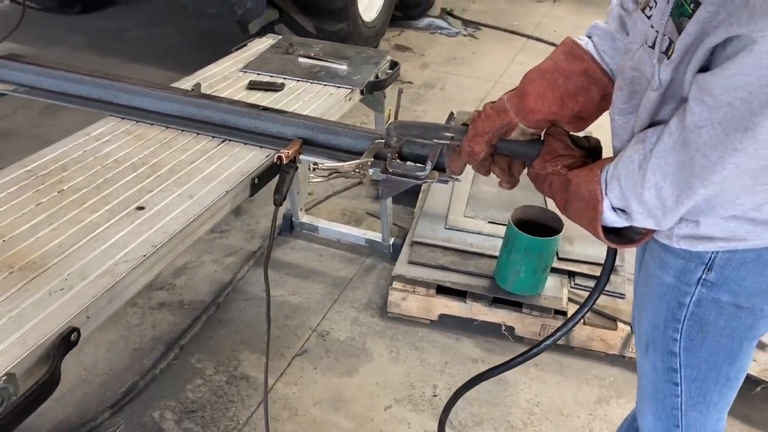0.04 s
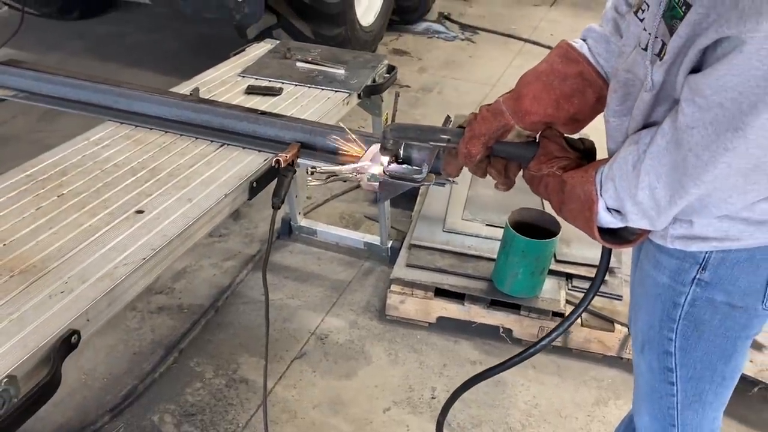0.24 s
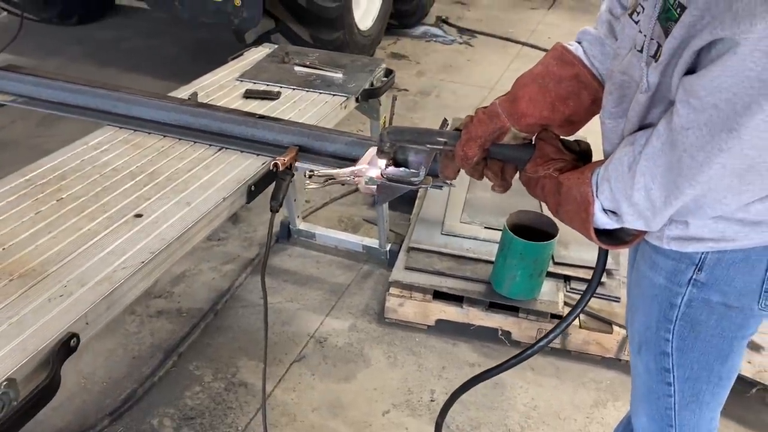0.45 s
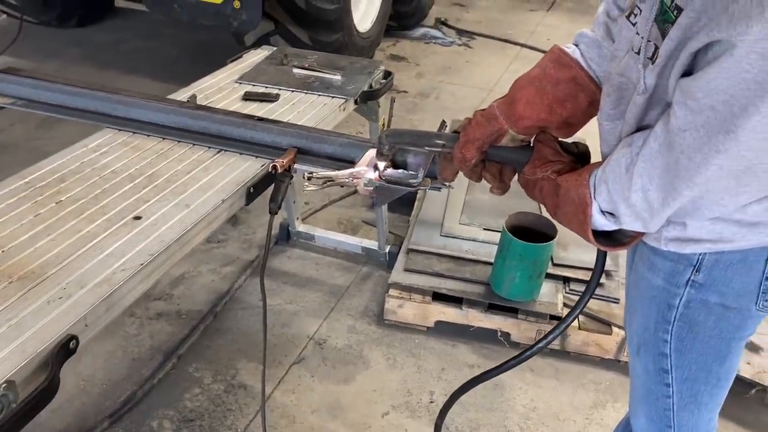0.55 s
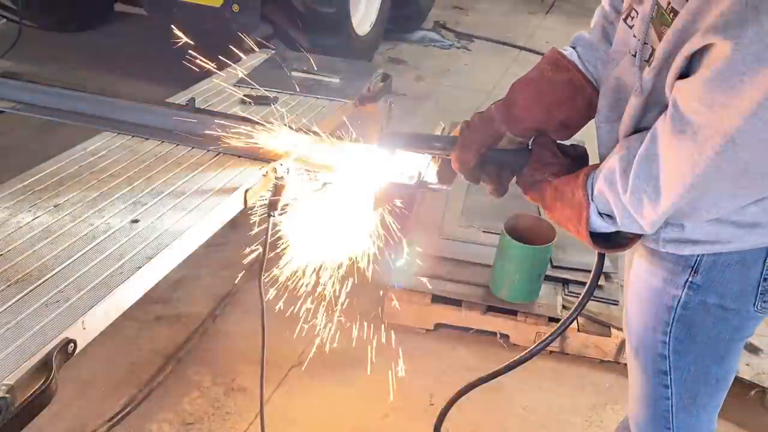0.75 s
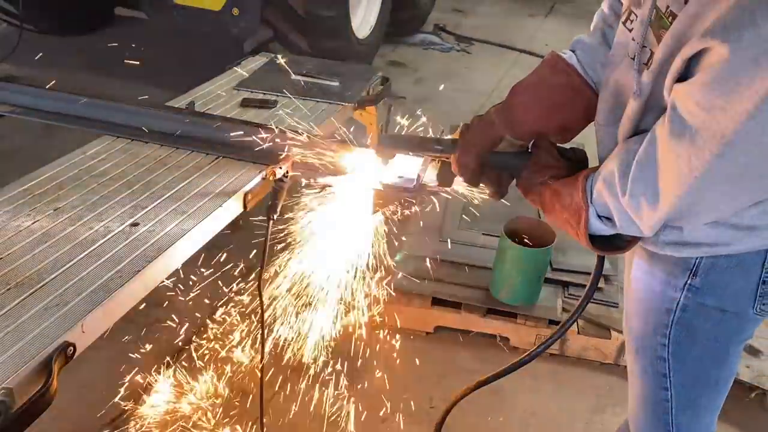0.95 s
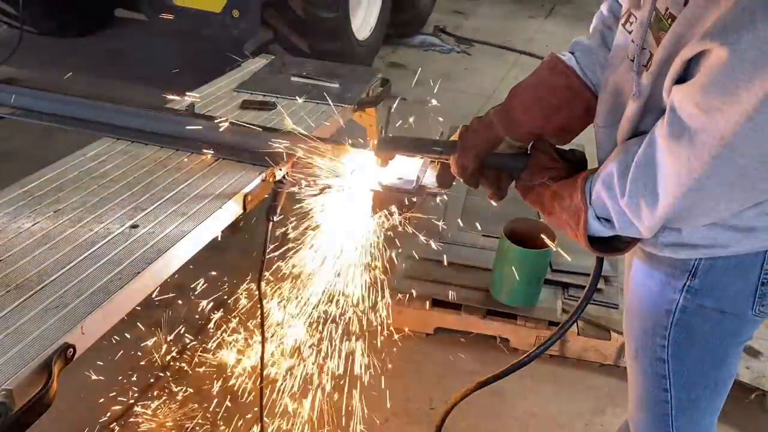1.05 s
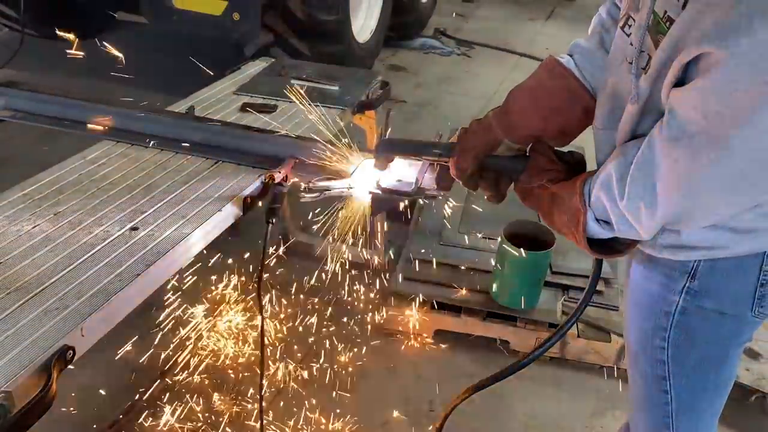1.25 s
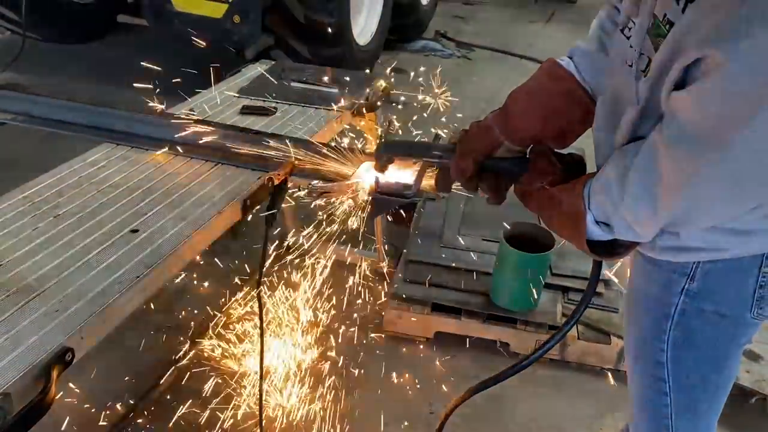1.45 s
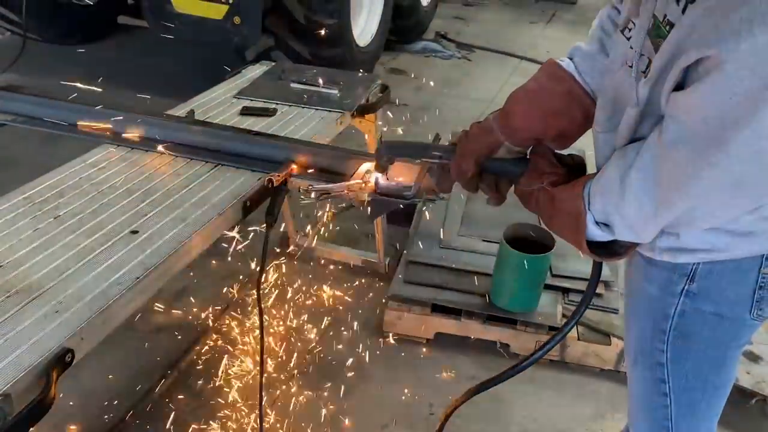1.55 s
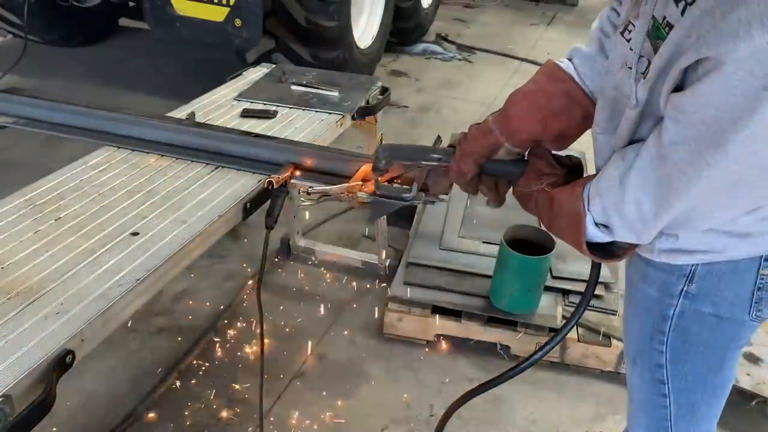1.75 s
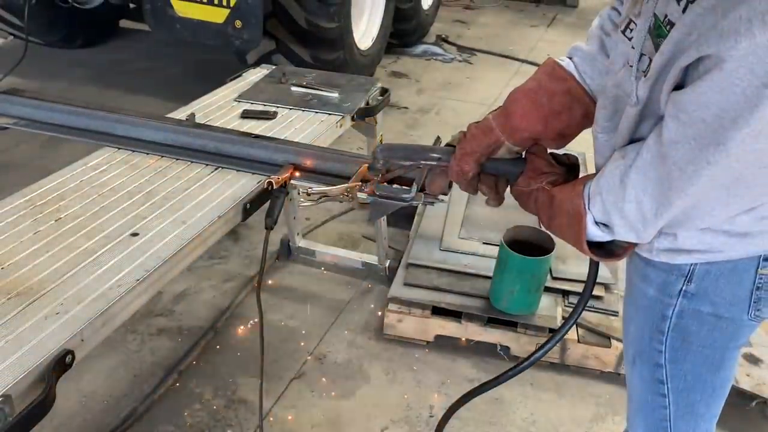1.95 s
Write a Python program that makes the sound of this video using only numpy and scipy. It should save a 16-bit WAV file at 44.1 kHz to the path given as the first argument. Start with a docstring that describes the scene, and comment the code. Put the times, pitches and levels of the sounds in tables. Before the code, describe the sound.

A plasma torch's harsh crackling hiss cuts metal, thins, snaps off, leaving soft blowing air

```python
"""A plasma torch cuts a steel tube in a workshop, heard through a close pair of microphone ports.
First comes room noise with a dying hiss; at 0.2 s the air valve opens and the pilot arc hisses (shaped noise).
Near 0.7 s the arc bites through with a thump and sputters molten steel: noise, random sparks, low puffs.
It runs off the edge into a thinner hiss near 1.4 s and pops, three pulses close together near 1.475 s.
At 1.74 s it pops once more and goes out, leaving the cooling air, again shaped noise, to blow."""
import sys
import numpy as np
from scipy.fft import rfft, irfft
from scipy.io import wavfile

SR = 44100
rng = np.random.default_rng(int(sys.argv[2]) if len(sys.argv) > 2 else 0)


def output_pcm(signal):
    """Save a mono or channel-first signal as 16-bit PCM at the path in sys.argv[1].

    Samples are clipped to [-1, 1] before scaling.
    """
    pcm = np.clip(np.atleast_2d(signal).T, -1, 1) * 32767
    wavfile.write(sys.argv[1], SR, np.round(pcm).astype(np.int16))


N = 88200
TIME = np.arange(N) / SR  # s
FREQS = np.maximum(np.fft.rfftfreq(N, 1 / SR), 1)  # Hz, kept above zero for logs and divisions
CUTOFF_HZ = 15900


def from_db(db):
    """Decibels to amplitude gain."""
    return 10 ** (np.asarray(db) / 20)


def rms_one(x):
    """Scale to unit rms."""
    return x / np.sqrt(np.mean(x ** 2) + 1e-20)


def over_hz(points):
    """A table joined by straight lines over log frequency."""
    hz, value = np.transpose(points)
    return np.interp(np.log(FREQS), np.log(hz), value)


def over_time(points):
    """A two-column table joined by straight lines over time."""
    return np.interp(TIME, *np.transpose(points))


def low_part(x, edge_hz, order):
    """The part of a sound below an edge, without any delay."""
    return irfft(rfft(x) / (1 + (FREQS / edge_hz) ** order), N)


def drift(rate_hz):
    """Random wandering, mostly slower than the rate, with spread 1."""
    return rms_one(low_part(rng.standard_normal(N), rate_hz, 2))


def far_noise(colour):
    """Diffuse room noise, alike in both channels only in the bass; rms 1."""
    alike = 1 / (1 + (FREQS / 450) ** 2)
    white = rfft(rng.standard_normal((3, N)))
    channels = np.sqrt(alike) * white[0] + np.sqrt(1 - alike) * white[1:]
    return rms_one(irfft(from_db(over_hz(colour)) * channels, N))


# Colour of the room noise: pitch_hz, level_db
SHOP_COLOUR = [(20, -12), (55, -1), (120, 5), (300, -2), (1000, -5), (3000, -2.5), (7000, -9), (10000, -34),
               (16000, -42)]
# Colour of the dying hiss: pitch_hz, level_db
TAIL_COLOUR = [(50, -3), (180, -1), (500, -4), (1200, 0), (2000, 2.5), (2900, 0.5), (6200, -4.5), (7000, 3),
               (7800, -8), (12000, -12), (16000, -13)]
SHOP_DB, TAIL_START_DB = -67.5, -52.5
TAIL_BRIGHT_HZ = 5970  # the hiss is split here into a dull and a bright part
DULL_FALL_DB_PER_S, BRIGHT_FALL_DB_PER_S = 77, 166


def workshop():
    """Steady diffuse room noise and a dying hiss whose treble fades faster than the rest."""
    tail = from_db(TAIL_START_DB) * far_noise(TAIL_COLOUR)
    dull = low_part(tail, TAIL_BRIGHT_HZ, 4)
    bright = tail - dull
    dying_dull = dull * from_db(-DULL_FALL_DB_PER_S * TIME)
    dying_bright = bright * from_db(-BRIGHT_FALL_DB_PER_S * TIME)
    return from_db(SHOP_DB) * far_noise(SHOP_COLOUR) + dying_dull + dying_bright


def echo(share):
    """Response of the direct sound plus one reflection from a surface close by, 3.6 ms later."""
    return 1 + share * np.exp(-2j * np.pi * FREQS * 0.0036)


def scatter():
    """Response of the direct sound plus weak early reflections from bench, pallets and floor."""
    count = 16
    delays_s = rng.uniform(.004, .03, count)
    sizes = rng.choice([-1, 1], count) / np.sqrt(count)
    spray = sum(size * np.exp(-2j * np.pi * FREQS * s) for s, size in zip(delays_s, sizes))
    return 1 + 0.28 * spray


# How far the left port leads the right: pitch_hz, lead_rad
PORT_PHASE = [(50, .05), (1700, .3), (2800, 1.8), (3300, .3), (4000, .3), (5300, 1.9), (6300, .5),
              (7000, .3), (7900, -2.9), (8750, -3.3), (9750, -6.1), (10400, -6.4), (11600, -9.3),
              (12550, -9.5), (13650, -12.4), (14700, -12.8), (15200, -15.6), (16000, -15.7)]
# Level of the left port above the right: pitch_hz, difference_db
PORT_BALANCE = [(100, 2.5), (600, 0), (1500, -2.5), (3200, 1.5), (4300, -0.5), (7200, 2), (8500, 0.5),
                (16000, 0)]


def at_ports(left, right):
    """Two spectra get the phase and level differences of the ports; returns stereo sound."""
    tilt = from_db(over_hz(PORT_BALANCE) / 2)
    right_lag = np.exp(-1j * over_hz(PORT_PHASE))
    return irfft(np.array([left * tilt, right / tilt * right_lag]), N)


# Likeness of a near sound at the two ports, 1 being the same: pitch_hz, likeness
PORT_LIKENESS = [(60, .93), (500, .86), (1300, .88), (2800, .55), (4000, .85), (5600, .42), (7300, .5),
                 (8400, .98), (9100, .75), (10000, .97), (10900, .78), (12000, .98), (13000, .8),
                 (14000, .97), (15000, .75), (15600, .97)]


def near_noise(source, gain):
    """A coloured source plus its diffuse reflections, which differ between the ports; rms 1."""
    alike = np.clip(over_hz(PORT_LIKENESS), 0, .995)
    shared = np.sqrt(alike) * rfft(rms_one(source))
    diffuse = np.sqrt(1 - alike) * rfft(rng.standard_normal((2, N)))
    left, right = gain * (shared + diffuse)
    return rms_one(at_ports(left, right))


# Narrow resonances of the torch and the work: pitch_hz, width_hz, lift_db
RESONANCES = [(517, 130, 3.5), (742, 70, 5.5), (1078, 21.5, 8.5), (1152, 130, 6), (1385, 76, 6.5),
              (1732, 73, 5.5), (2490, 49, 4.5), (3263, 40, 5.5), (3553, 91, 7.5), (3820, 100, 4),
              (4040, 30, 4.5), (4060, 35, 3), (4250, 58, 4), (4810, 130, 2), (5520, 120, 2.5),
              (6470, 77, 2.5), (6685, 56, 4), (11160, 92, 7)]
ROAR_BELOW_HZ = 3120  # the roar lies below this, the hiss above


def torch(stage, colour, sparks_per_s, spark_db, flutter_db, roar_flutter_db):
    """Jet turbulence and the crackle of sparks, through the resonances; hiss and roar flutter separately."""
    time_s, level_db, roar_db = np.transpose(stage)
    # Sparks strike at random with uneven strength; spark_db is their level against the turbulence
    sizes = from_db(5.2 * np.minimum(rng.exponential(1, N), 3.5)) * rng.choice([-1, 1], N)
    sparks = rms_one(sizes * (rng.random(N) < sparks_per_s / SR))
    source = rng.standard_normal(N) + from_db(spark_db) * sparks

    lift_db = sum(lift / (1 + (2 * (FREQS - hz) / width) ** 2) for hz, width, lift in RESONANCES)
    gain = from_db(over_hz(colour) + lift_db) * echo(0.068) * scatter()
    jet = near_noise(source, gain)

    roar = low_part(jet, ROAR_BELOW_HZ, 6)
    hiss = jet - roar
    roar_gain = from_db(np.interp(TIME, time_s, roar_db) + roar_flutter_db * drift(36))
    hiss_gain = from_db(flutter_db * drift(58))
    # Outside its table a stage is silent
    level = from_db(np.interp(TIME, time_s, level_db, left=-120, right=-120))
    return level * (hiss * hiss_gain + roar * roar_gain)


def waver(x, count=18):
    """Overlapping bands of the jet, evenly spaced in Hz, each swell and fade a little on their own."""
    place = np.minimum(FREQS / CUTOFF_HZ, 1) * (count - 1)
    spectrum = rfft(x)
    out = 0
    for k in range(count):
        band = irfft(spectrum * np.maximum(1 - abs(place - k), 0), N)
        out = out + band * from_db(1.0 * drift(7.1))  # spread 1 dB
    return out


# Lift of the harsh upper middle of the jet: time_s, lift_db
HARSHNESS = [(.25, 0), (.33, 1.1), (.55, 2), (.67, 0), (.745, 3.5), (.85, 1), (1.05, 1.5), (1.2, -2),
             (1.42, -1), (1.68, 2.5), (1.82, -3.5), (1.97, 0.5)]
HARSH_HZ, HARSH_HALF_WIDTH_HZ = 4000, 930


def harshen(x):
    """The upper middle of the jet comes forward and recedes."""
    band = irfft(rfft(x) / (1 + ((FREQS - HARSH_HZ) / HARSH_HALF_WIDTH_HZ) ** 4), N)
    return x + band * (from_db(over_time(HARSHNESS)) - 1)


# The pilot arc, roar_db being extra level of the roar: time_s, level_db, roar_db
PILOT_ARC = [(.199, -81, 9), (.206, -58, 18), (.213, -61, 12), (.216, -50, 11), (.227, -52.5, 3),
             (.232, -31.5, 2.5), (.26, -20, -2.5), (.305, -16.3, -5.5), (.35, -18.5, 1), (.44, -18.5, 2),
             (.545, -17, -1), (.585, -20, -4), (.68, -21.5, -6.5), (.73, -22.5, 1)]
# Its colour: pitch_hz, level_db
PILOT_COLOUR = [(40,-20), (100,-18), (250,-21.5), (450,-18), (850,-15), (1000,-12), (1150,-10.5),
                (1500,-12.5), (1800,-9), (2550,-8.5), (2780,-12.5), (3300,-10), (3900,-6), (5000,-7.5),
                (6600,-5), (7400,-7), (8400,-5.5), (9200,-2.5), (10500,-1.5), (11500,2), (12400,-0.5),
                (13400,3), (14800,-2.5), (15700,-3)]


def pilot_arc():
    """The air valve opens and the pilot arc hisses: turbulence with the densest sparks."""
    return torch(PILOT_ARC, PILOT_COLOUR, sparks_per_s=3000, spark_db=-9.5, flutter_db=.5, roar_flutter_db=1.0)


# Low puffs of air and blown-out melt, length_s being the spread of the bell: peak_s, level_db, length_s, top_hz
PUFFS = [(0.221, -55, 0.0086, 496), (0.274, -53.5, 0.026, 268), (0.337, -54, 0.009, 150),
         (0.598, -49.5, 0.041, 141), (0.737, -41, 0.0094, 218), (0.77, -36.5, 0.018, 74),
         (.88, -53, 0.058, 55), (1.037, -48.5, 0.014, 95), (1.152, -44.5, 0.022, 132),
         (1.189, -42, 0.0036, 85), (1.253, -42, 0.016, 300), (1.314, -41.5, 0.015, 124)]


def puffs():
    """Bell-shaped swells of low rumble, each about an octave wide; the strongest make the thump."""
    out, white = 0, rfft(rng.standard_normal(N))
    for peak_s, level_db, length_s, top_hz in PUFFS:
        bottom_hz = 0.52 * top_hz
        band = 1 / np.sqrt((1 + (FREQS / top_hz) ** 6) * (1 + (bottom_hz / FREQS) ** 6))
        swell = np.exp(-.5 * ((TIME - peak_s) / length_s) ** 2)
        rumble = rms_one(swell * irfft(white * band, N))
        # The swell's own rms makes the level hold at its peak, whatever its length
        out = out + from_db(level_db) * rumble * np.sqrt(np.mean(swell ** 2))
    return out


# The arc in the steel, roar_db being extra level of the roar: time_s, level_db, roar_db
CUTTING = [(.66, -40.5, 0), (.71, -24, 1.5), (.738, -17.5, -0.5), (.76, -18.5, -2), (.8, -20.5, 1),
           (.85, -21, -1.5), (.95, -22.5, -1), (1.03, -19.5, -1.5), (1.11, -20.5, 2.5), (1.21, -17.5, -0.5),
           (1.25, -20, 1), (1.315, -19, 0), (1.37, -23, -7.5), (1.43, -27.5, -10)]
# Its colour: pitch_hz, level_db
CUT_COLOUR = [(40,-17), (100,-13.5), (250,-14), (500,-16), (950,-16), (1150,-13.5), (1550,-15.5),
              (2200,-12.5), (2900,-11), (3600,-9.5), (4300,-7), (4900,-7), (5600,-1.5), (6500,-6),
              (7400,-6.5), (8300,-2), (10400,-1.5), (11400,-1.5), (12500,-3), (13700,3), (15700,-4.5)]


def cutting():
    """The arc bites through and sputters molten steel: a fuller jet with dense sparks."""
    return torch(CUTTING, CUT_COLOUR, sparks_per_s=2500, spark_db=-10, flutter_db=0.53, roar_flutter_db=1.0)


# The arc off the edge, roar_db being extra level of the roar: time_s, level_db, roar_db
FREE_ARC = [(1.3, -29, 1), (1.37, -30.5, 2), (1.43, -26, -2), (1.48, -23.5, 2), (1.51, -27, -1),
            (1.6, -29, 1.5), (1.735, -28.5, 3.5), (1.748, -35.5, 8.5), (1.8, -57, 15)]
# Its colour: pitch_hz, level_db
FREE_COLOUR = [(40, -24.5), (100, -24), (250, -25), (500, -24), (900, -19.5), (1200, -18.5), (1800, -10),
               (2300, -9), (2900, -10), (3700, -8), (4400, -2.5), (5500, -3.5), (6700, -2), (7400, -3),
               (8400, -1.5), (9200, -0.5), (11600, 0), (13000, 3), (15700, -5.5)]


def free_arc():
    """The arc runs off the edge: a thinner hiss with fewer sparks and a more unsteady roar."""
    return torch(FREE_ARC, FREE_COLOUR, sparks_per_s=1400, spark_db=-14.5, flutter_db=0.5, roar_flutter_db=1.9)


# The arc snaps as it loses the metal: start_s, strength_db, bright_hz, low_hz (upper and lower edge)
POPS = [(1.4724, -7, 2200, 1000), (1.4776, -11, 5000, 2800), (1.4797, -0.5, 2200, 288),
        (1.7389, -4, 3400, 280)]


def pops():
    """Single pressure pulses whose lows arrive a millisecond or so late, with their reflections."""
    w, pulses = 1j * FREQS, 0
    for start_s, strength_db, bright_hz, low_hz in POPS:
        high_pass = w ** 2 / (w ** 2 + w * low_hz + low_hz ** 2)
        low_pass = 1 / (1 + np.sqrt(3) * w / bright_hz + (w / bright_hz) ** 2)
        delay = np.exp(-2 * np.pi * w * start_s)
        pulses = pulses + from_db(strength_db) * high_pass * low_pass * delay
    smear = ((450 - w) / (450 + w)) ** 2  # two all-pass steps at 450 Hz delay the lows
    sound = pulses * smear * echo(0.35) * scatter()
    return at_ports(sound, sound)


# The air dips just after the arc goes out; roar_db is extra level of the roar: time_s, level_db, roar_db
COOLING_AIR = [(1.72, -45, -2), (1.745, -41, 1), (1.785, -35, -7), (1.825, -36.5, -10.5),
               (1.855, -34, -5.5), (1.885, -34.5, -1.5), (1.96, -38.5, 6.5), (2.0, -39, 3)]
# Its colour: pitch_hz, level_db
AIR_COLOUR = [(40,-50), (200,-32), (500,-16.5), (850,-14.5), (1200,-11.5), (1550,-11), (1900,-4.5),
              (2500,-6.5), (3000,-9.5), (3700,-8.5), (4500,-5), (7500,-6.5), (8400,-4), (10000,0.5),
              (11400,-9.5), (12600,-1), (15700,-6)]


def cooling_air():
    """The cooling air blows on: turbulence with only a trace of crackle."""
    return torch(COOLING_AIR, AIR_COLOUR, sparks_per_s=910, spark_db=-26, flutter_db=0.5, roar_flutter_db=1.2)


def scene():
    """The torch goes through its four stages in the workshop, with puffs and pops."""
    jet = pilot_arc() + cutting() + free_arc() + cooling_air()
    return workshop() + harshen(waver(jet)) + puffs() + pops()


def record(dry):
    """The deepest bass and the top are cut steeply."""
    bass_cut = 1 / np.sqrt(1 + (40 / FREQS) ** 12)
    top_cut = 1 / np.sqrt(1 + (FREQS / CUTOFF_HZ) ** 600)
    return irfft(rfft(dry) * bass_cut * top_cut, N)


dry = scene()
out = record(dry)
output_pcm(out)
```